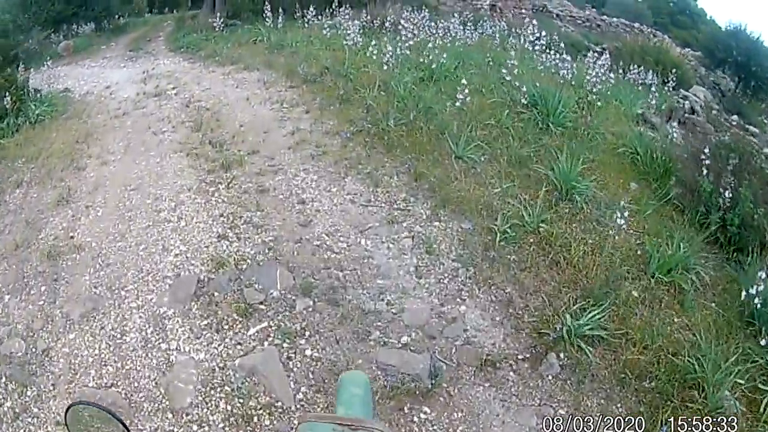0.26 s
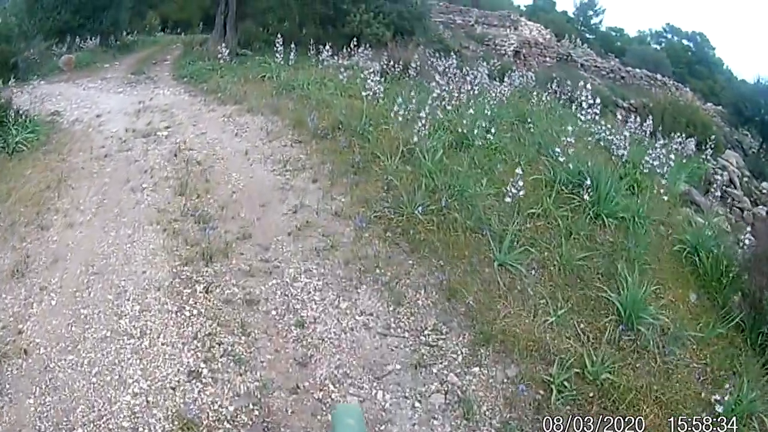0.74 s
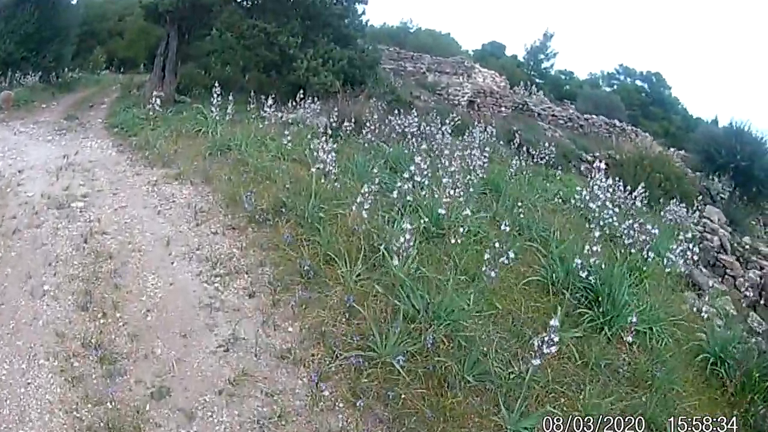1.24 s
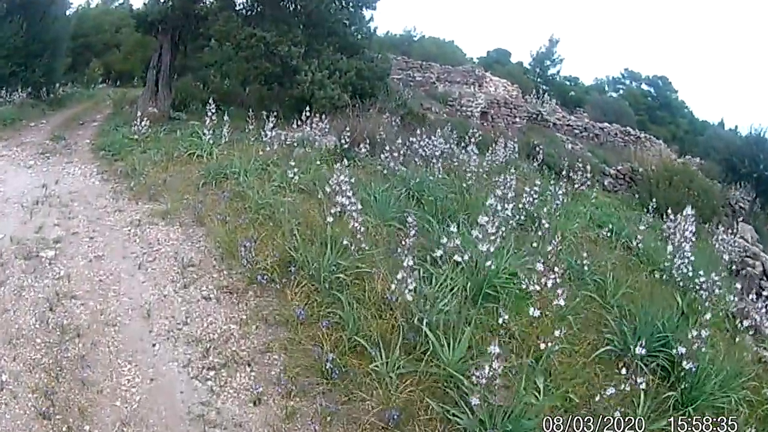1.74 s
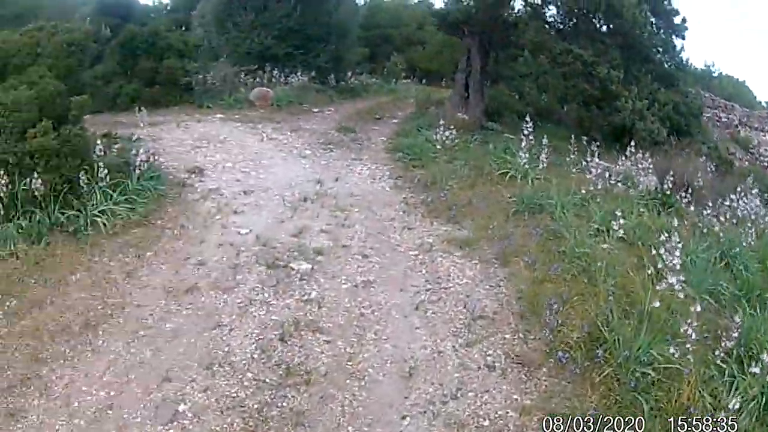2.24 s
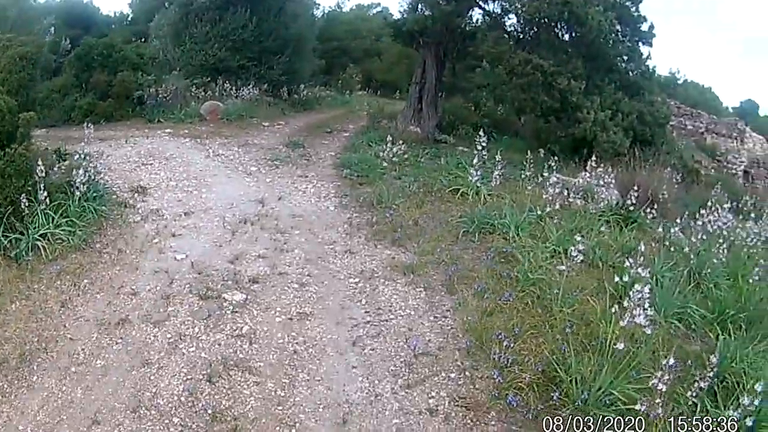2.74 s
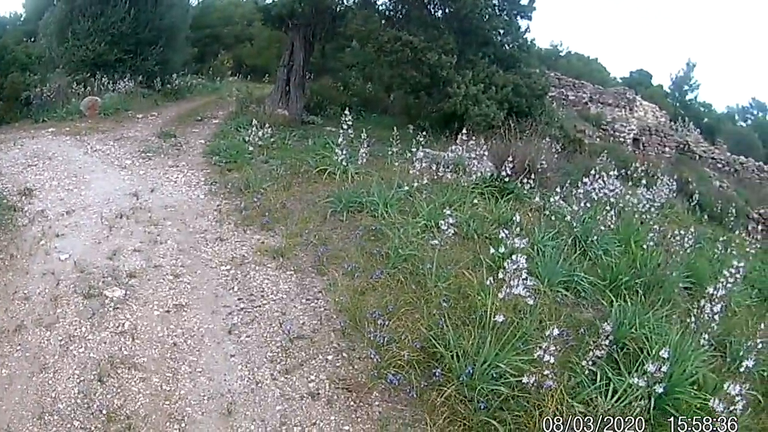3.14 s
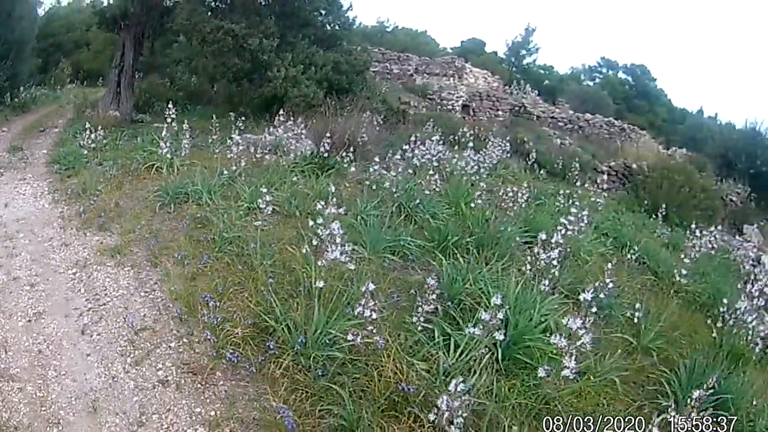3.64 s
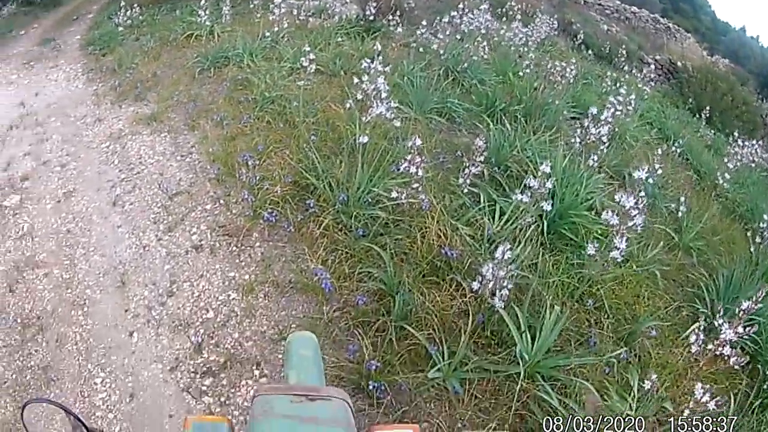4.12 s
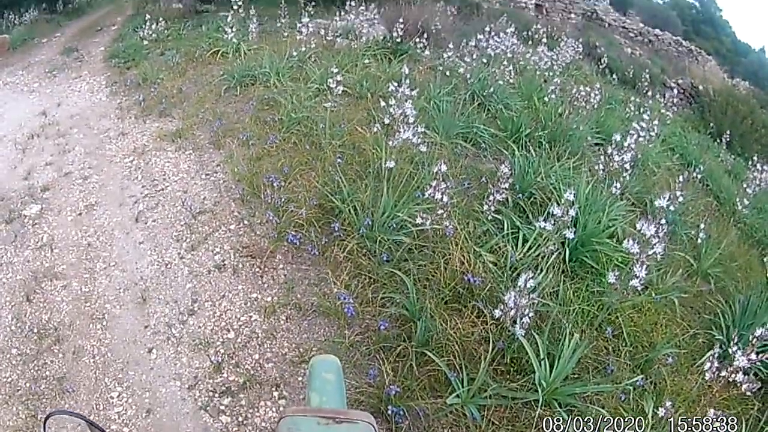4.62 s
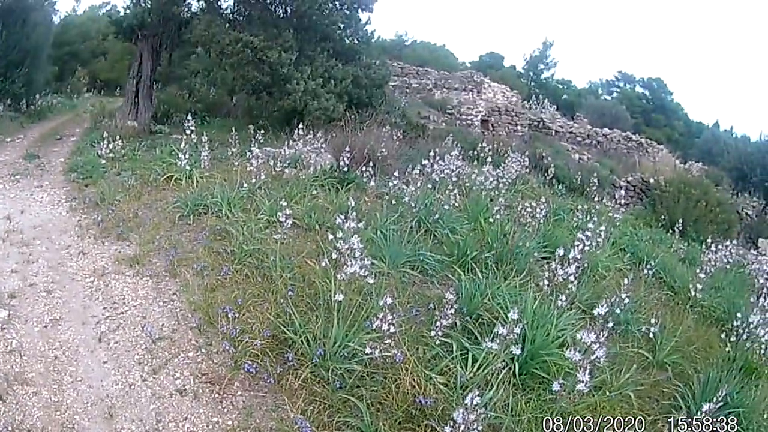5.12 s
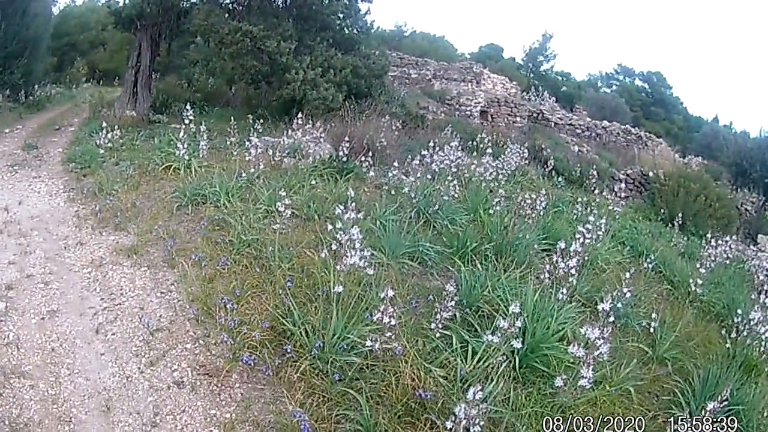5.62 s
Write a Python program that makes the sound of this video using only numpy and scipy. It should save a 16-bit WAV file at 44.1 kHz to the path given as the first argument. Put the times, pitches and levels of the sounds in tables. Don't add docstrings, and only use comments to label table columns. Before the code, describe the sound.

A small single-cylinder four-stroke motorcycle runs outdoors, heard close from the rider's helmet through a muffled microphone with rolled-off treble and little deep bass. At 0 s the engine is still spinning fast. From 0.1 to 0.9 s the throttle opens: rapid, firm exhaust beats, about 23 to 29 a second, harden and rise slightly, with a short gassy rasp on each. At 0.9 s it shuts; the beats turn rounder and slow down, a thin gear whine swells around 1 s, and a loose metal part chinks repeatedly, mostly from 0.5 to 2 s. By about 2.1 s it settles into a soft, slightly uneven idle near fifteen or sixteen beats a second, continuing to the end. Uneven valve ticks ring the cases over a throbbing whirr and low rumble. Stronger single pops come near 3.4, 4.6 and 5.1 s; mechanical whirr lifts around 4.3 s. Sparse faint chinks remain, with a clearer one near 5.8 s, over slight hiss.

```python
import sys
import numpy as np
from scipy import signal
from scipy.fft import rfft, irfft
from scipy.io import wavfile
from scipy.ndimage import uniform_filter1d

SR = 44100
rng = np.random.default_rng(int(sys.argv[2]) if len(sys.argv) > 2 else 0)


def store_wav(level_fs):
    pcm = np.round(np.clip(np.atleast_2d(level_fs), -1, 1) * 32767)
    wavfile.write(sys.argv[1], SR, pcm.T.astype(np.int16))


def invert_db(level):
    return 10 ** (np.asarray(level, dtype=float) / 20)


N = 258867
IDLE_RPM = 1860
THROTTLE_OPEN_S, THROTTLE_SHUT_S = 0.1, 0.905
LAST_CYCLE_S = 0.064
LEAD_S = 0.012
# valve_opens_s, pressure, heat, push (relative)
STRAY_CYCLES = [(.08, .69, .85, .69), (.1169, .3, 1.42, -.68), (.398, 1.24, 1.41, -.34),
                (.5074, 1.27, 1.42, -.18), (.8884, .49, 1.47, .18), (1.2291, .88, .84, .41),
                (1.4355, 1.68, .95, .42), (1.5437, -.18, 1.21, .7), (1.656, .17, 1.29, .68),
                (1.83, -.24, 1.31, .57), (1.889, -.29, 1.0, .61), (2.0094, .7, 1.01, .66),
                (3.4119, .99, 1.12, .26), (4.0595, .21, .94, .56), (4.5821, 1.08, 1.11, .29),
                (5.1103, 1.06, 1.1, .31)]


def lag(hz, s):
    return np.exp(-2j * np.pi * hz * s)


def poles(hz, corner_hz, order):
    return (1 + 1j * hz / corner_hz) ** -order


def unit(x):
    return x / np.sqrt(np.mean(x ** 2))


def walk(rate):
    k = int(SR / rate)
    steps = np.repeat(rng.standard_normal(N // k + 1), k)
    return 1.66 * uniform_filter1d(uniform_filter1d(steps, k), k)[:N]


def band(x, lo_hz, hi_hz):
    return signal.sosfilt(signal.butter(2, [lo_hz, hi_hz], "bandpass", fs=SR, output="sos"), x)


def ring(x, hz, t60):
    pole = np.exp(2j * np.pi * hz / SR - np.log(1000) / (t60 * SR))
    return signal.lfilter([1], [1, -pole], x).imag


def fade(x, decay_s):
    return signal.lfilter([1], [1, -np.exp(-1 / (decay_s * SR))], x)


def clicks(times, sizes):
    out, at = np.zeros(N), (np.asarray(times) * SR).astype(int)
    keep = (at >= 0) & (at < N)
    np.add.at(out, at[keep], sizes[keep])
    return out


def exhaust(size=4096):
    s, pressure, heat, push = (c[:, None] for c in np.transpose(putts()))
    hz = np.fft.rfftfreq(size, 1 / SR)
    cycle_s = np.diff(s, axis=0, append=s[-1:] + LAST_CYCLE_S)
    steep = np.clip((heat - 1.3) / 0.08, 0, 1) * np.clip(pressure / 0.8, 0, 1)
    valve_edge = 0.013 / np.maximum(pressure ** 2 / 1.6, 1)
    blow_down = pressure * silencer(hz, heat, valve_edge, 0.0004) * lag(hz, 0.0004 * (pressure > 1.5))
    piston = push * silencer(hz, 1.083, 0.012, 0.0015) * lag(hz, 0.267 * cycle_s)
    swell = 0.3 * (pressure > 1.5) * poles(hz, 120, order=3) * lag(hz, -0.0045)
    wave = (steep * shock_front(hz, heat) - blow_down - piston + swell) * lag(hz, LEAD_S)
    outlet = (1j * hz / 84) ** 2 * poles(hz, 84, order=2)
    housing = poles(hz, 2000, order=5) * 1j * hz / 22 * poles(hz, 22, order=1)
    puffs = irfft(wave * outlet * housing, size) * invert_db(47.8)
    out = np.zeros(N + 2 * size)
    starts = ((s[:, 0] - 0.0003 - LEAD_S) * SR).astype(int) + size
    for at, puff in zip(starts, puffs):
        out[at:min(at + size, len(out))] += puff[:len(out) - at]
    return out[size:size + N] + gas_rasp(s[:, 0], steep[:, 0])


def silencer(hz, heat, edge, edge_s):
    u = 1j * hz / (104.6 * heat)
    chamber = 1 + 1.76 * u / (1 + 0.33 * u + u * u)
    puff = poles(hz, 43.7 * heat, order=3) * 1j * hz / 100
    return chamber * puff + edge * lag(hz, edge_s) * poles(hz, 560, order=4)


def shock_front(hz, heat):
    front = 0.23 * poles(hz, 200, order=2) * poles(hz, 1300, order=1) * lag(hz, 0.0017)
    dip = 0.036 * poles(hz, 850, order=3) * lag(hz, 0.0011)
    pipe_echo = 1 + 0.7 * lag(hz, 0.0100 / heat) * poles(hz, 950, order=2)
    warm = np.clip((heat - 1.35) / 0.07, 0.05, 1)
    header_echo = 1 + warm * (0.14 * lag(hz, 0.002) - 0.16 * lag(hz, 0.00417))
    sharpness = poles(hz, 380 + 6000 * warm ** 3, order=2)
    u = 1j * hz / (450 * heat)
    header_ring = 1 + 1.1 * warm * 0.5 * u / (1 + 0.5 * u + u * u)
    return 0.85 * (front - dip) * pipe_echo * header_echo * sharpness * header_ring


def gas_rasp(opens_s, steep):
    burst = fade(clicks(opens_s + 0.0012, steep), 0.0054)
    noise = band(burst * rng.standard_normal(N), 1800, 4400)
    return invert_db(-44) * band(noise, 1500, 4800)


def putts():
    lone_burn_gulp = (-0.8, 0.99, 0.45)
    early_shut_s, starved_s = -0.023, 1.35
    s = valve_times()
    chance = rng.standard_normal((len(s), 3)).T
    since_open = s - THROTTLE_OPEN_S
    since_shut = s - np.where(s < THROTTLE_OPEN_S, early_shut_s, THROTTLE_SHUT_S)
    fuelled = np.where(since_shut < 0, load(since_open, chance), overrun(since_shut, chance))
    rows = np.c_[s, np.where(s > starved_s, idle(s, chance), fuelled).T]
    for row in STRAY_CYCLES:
        k = np.argmin(abs(s - row[0]))
        rows[k] = row
        if row[0] > 3 and row[1] > 0.9:
            rows[k - 1, 1:] = lone_burn_gulp
    return rows


def load(since_open, chance):
    pressure = 1.06 + 0.08 * chance[0]
    heat = 1.43 - 0.1 * np.exp(-since_open / 0.17) + 0.0057 * chance[1]
    push_start, push_end = -0.68, -0.13
    push = push_end + (push_start - push_end) * np.exp(-since_open / 0.22) + 0.025 * chance[2]
    return [pressure, heat, push]


def overrun(since_shut, chance):
    pressure = 2.14 + 0.05 * chance[0]
    heat = 0.89 + 0.24 * np.exp(-abs(since_shut) / 0.23)
    push = -0.2 + 0.75 * since_shut + 0.04 * chance[2]
    return [pressure, heat, push]


def idle(s, chance):
    scatter = 0.11 * chance[0]
    pressure = -0.54 + scatter
    heat = 1.085 + 0.4 * scatter + 0.024 * chance[1]
    push = np.minimum(0.52 * (rpm(s) / IDLE_RPM) ** 2, 0.7) + 0.015 * chance[2]
    return [pressure, heat, push]


def rpm(s):
    # start_s, speed_rpm
    crank = [(0.0, 3398.7), (0.13, 2787.7), (0.483, 3336.5), (0.671, 3504.6), (0.886, 3477.3),
             (0.999, 2882.4), (1.322, 2334.6), (1.615, 2118.4), (2.079, 1945.8), (2.293, 1956.4),
             (2.506, 1839.8), (2.85, 1876.6), (3.373, 1841.4), (4.078, 1858.9), (4.741, 1805.0),
             (4.992, 1857.9), (5.012, 1781.5), (6.1, 1963.0)]
    return np.interp(s, *np.transpose(crank))


def valve_times():
    first_valve, hot_lead_s = 0.1568, 0.0037
    step_s = 0.0005
    t = np.arange(0, N / SR, step_s)
    cycles = np.cumsum(rpm(t)) * step_s / 120
    s = np.interp(np.arange(first_valve, cycles[-1]), cycles, t)
    s = s - hot_lead_s * ((s > THROTTLE_OPEN_S) & (s < THROTTLE_SHUT_S))
    for row in STRAY_CYCLES:
        s[np.argmin(abs(s - row[0]))] = row[0]
    return s


def cycle_times(shares):
    s = valve_times()
    s = np.r_[s[0] - 0.038, s]
    cycle_s = np.diff(s, append=s[-1] + LAST_CYCLE_S)
    return s[:, None] + cycle_s[:, None] * np.asarray(shares)


def tilt(hz, running):
    cases, gears, fan = running
    place = np.interp(np.log(hz), np.log([700, 1400, 3300]), [0, 1, 2])
    gears_share = np.interp(place, [0, 1, 2], [0, 1, 0])
    fan_share = np.interp(place, [0, 1, 2], [0, 0, 1])
    return cases + gears_share * gears + fan_share * fan


def valve_gear(running):
    # cycle_share (0-1), level_db
    ticks = [
        (.02, 4),
        (.33, 5),
        (0.524, 1),
        (.72, -2.5),
        (0.802, 1),
        (0.898, -5),
    ]
    # pitch_hz, t60_s, level_db
    case_modes = [(371.8, 0.064, -4), (483, 0.12, -3.5), (651, .04, -9), (729.7, 0.06, -8),
                  (1120, 0.0061, -16.5), (1588, 0.026, -13), (2084, 0.12, -27.5), (4100, 0.021, -33.5),
                  (5670, 0.033, -48)]
    share, tick_db = np.transpose(ticks)
    times = cycle_times(share)
    chance = rng.standard_normal(times.shape + (2,))
    tick_s = times + 0.0002 * chance[..., 0]
    tick_size = invert_db(tick_db + 1.5 * chance[..., 1])
    train = clicks(tick_s.ravel(), tick_size.ravel())
    scrape = fade(train, 0.0031)
    knock = 15 * train
    cases = 0
    for hz, t60, db in case_modes:
        blow = scrape * rng.standard_normal(N) + knock * poles(hz, 790, order=2).real
        mode = ring(band(blow, hz / 1.565, hz * 1.9), hz, t60)
        cases = cases + invert_db(db + tilt(hz, running)) * mode
    return invert_db(-21.5) * cases + valve_seating(running)


def valve_seating(running):
    # pitch_hz, t60_s, level_db
    seat_modes = [(2327, 0.032, 0.5), (2462, 0.022, -6.5)]
    times = cycle_times([0.2, 0.27])
    sizes = invert_db(2 * rng.standard_normal(times.shape)) * [1.2, 0.45]
    blows = clicks(times.ravel(), sizes.ravel())
    seating = 0
    for hz, t60, db in seat_modes:
        seating = seating + invert_db(db) * ring(band(blows, hz / 1.3, hz * 1.3), hz, t60)
    return invert_db(-17.5 + tilt(2800, running)) * seating


def whirr(running):
    # pitch_hz, level_db (dB per Hz)
    spectrum = [(140, -20.5), (200, -14.5), (300, -14.5), (480, -3.5), (660, -14), (1140, -18.5),
                (1650, -25.5), (1900, -34), (2400, -38.5), (2850, -53.5), (3400, -40.5), (4100, -48.5),
                (4800, -62), (5800, -53), (7500, -72.5)]
    turns = cycle_times([0])[:, 0]
    phase = np.interp(np.arange(N) / SR, np.r_[turns, turns[-1] + LAST_CYCLE_S], np.arange(len(turns) + 1))
    throb = np.cos(4 * np.pi * (phase - 0.27)) + 0.062 * np.cos(2 * np.pi * (phase - 0.75))
    points_hz, points_db = np.transpose(spectrum)
    out = 0
    for hz in 170 * 2 ** np.arange(0, 5.5, 1 / 3):
        db = np.interp(np.log(hz), np.log(points_hz), points_db) + 10 * np.log10(hz / 500)
        throb_db = min(2 + 0.5 * hz / 1000, 3.5)
        db = db + tilt(hz, running) + throb_db * throb + 1.1 * walk(20)
        noise = band(rng.standard_normal(N), hz * 0.897, hz * 1.151)
        out = out + invert_db(db) * unit(band(noise, hz * 0.889, hz * 1.322))
    return invert_db(-3) * out


def chinks():
    # start_s, peak_db, dull_mode_db, bright_mode_db
    contacts = [(0.506, -58, -51, -74), (0.7177, -69, -57, -69), (0.7428, -52.5, -52, -71),
                (0.8418, -67, -59, -84), (0.9292, -72, -62.5, -81), (0.978, -56, -51, -71),
                (1.0108, -63, -59, -81), (1.044, -53.5, -50, -64), (1.113, -65, -66, -78),
                (1.144, -69, -62, -78), (1.1932, -63, -54, -76), (1.2057, -60, -46.5, -76),
                (1.238, -66, -58, -77), (1.284, -58, -51.5, -68.5), (1.3252, -61.5, -59, -74),
                (1.5793, -63, -70, -81), (1.6196, -65, -72, -83), (1.6414, -65, -51, -78),
                (1.6757, -64, -56, -78), (1.9073, -63, -65, -74), (1.9384, -66, -62, -87),
                (2.3498, -71, -68.5, -94), (2.9687, -74, -76, -80), (2.9926, -72, -72, -83),
                (3.3553, -69, -73, -108), (5.1607, -71, -70, -79), (5.6062, -68, -74, -90),
                (5.7906, -59, -60, -75)]
    # pitch_hz, t60_s, level_column (index into contacts), level_db
    part_modes = [(5730, 0.028, 1, -21.5), (3976, 0.014, 2, -14), (3310, 0.013, 2, -16),
                  (2270, 0.04, 2, -20.5), (7130, 0.033, 3, -14), (8500, .02, 3, -26), (10300, .02, 3, -22)]
    rows, out = np.array(contacts), 0
    start_s, peak_db, dull_db = rows[:, 0], rows[:, 1], rows[:, 2]
    for hz, t60, column, db in part_modes:
        touch = clicks(start_s, invert_db(rows[:, int(round(column))] + db))
        touch = touch + 0.4 * np.roll(touch, int(0.0076 * SR))
        chatter = fade(touch, 0.0037) * rng.standard_normal(N)
        out = out + ring(band(chatter, hz / 1.2, hz * 1.1), hz, t60)
    crack = fade(clicks(start_s, invert_db(np.maximum(peak_db, dull_db - 8) + 2)), 0.004)
    return out + crack * band(rng.standard_normal(N), 2500, 7000)


def whine(t):
    contacts_per_cycle = 32.3
    unload = np.exp(-((t - 0.99) / 0.07) ** 2)
    db = -54 + 0.3 * 20 * np.log10(rpm(t) / IDLE_RPM) + 12 * unload + 1.8 * walk(15)
    pitch_hz = contacts_per_cycle * rpm(t) / 120 * (1 + 0.004 * walk(25))
    return invert_db(db) * np.sin(2 * np.pi * np.cumsum(pitch_hz) / SR)


def rumble(cases):
    return invert_db(cases - 6 + 2 * walk(5.6)) * unit(band(rng.standard_normal(N), 74, 215))


def running_levels(t):
    # start_s, level_db
    shake = [
        (0, -27),
        (.1, -34.5),
        (.3, -33.5),
        (.55, -29),
        (.85, -31.5),
        (1.25, -29.5),
        (1.45, -33),
        (1.9, -35),
        (5.87, -35),
    ]
    cases = np.interp(t, *np.transpose(shake))
    speed_db = 20 * np.log10(rpm(t) / IDLE_RPM)
    nod_db = 4 * np.exp(-((t - 4.3) / 0.35) ** 2)
    gears = -36 + 1.62 * speed_db + nod_db - cases
    fan_shake = 0.33
    fan = -3 + 0.92 * speed_db - (1 - fan_shake) * (cases - shake[-1][1])
    return cases, gears, fan


def head_turn(metal, t):
    turn = np.exp(-((t - 2.85) / 0.55) ** 4)
    return metal + turn * (0.96 * band(metal, 1660, 1880) - 0.29 * band(metal, 580, 1700))


def scene():
    t = np.arange(N) / SR
    running = running_levels(t)
    metal = head_turn(valve_gear(running) + whirr(running), t)
    return (exhaust() + metal + chinks() + whine(t) + rumble(running[0]))[None]


def preamp_hiss():
    # pitch_hz, level_db (dB per Hz)
    hiss_spectrum = [(20, 13), (300, 2.5), (3000, -1.5), (9000, -0.5), (12000, -0.5), (15500, 0.5),
                     (20000, 4.5)]
    hz, (points_hz, points_db) = np.fft.rfftfreq(N, 1 / SR), np.transpose(hiss_spectrum)
    colour = invert_db(np.interp(np.log(hz + 1), np.log(points_hz), points_db))
    return invert_db(-76.5) * unit(irfft(rfft(rng.standard_normal(N)) * colour, N))


def low_pass(x):
    return signal.sosfilt(signal.butter(12, 15720, fs=SR, output="sos"), x)


def record(dry):
    mix = dry + preamp_hiss()
    return low_pass(mix)


dry = scene()
out = record(dry)
store_wav(out)
```